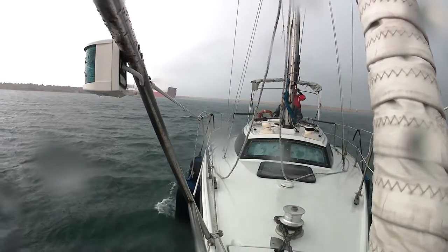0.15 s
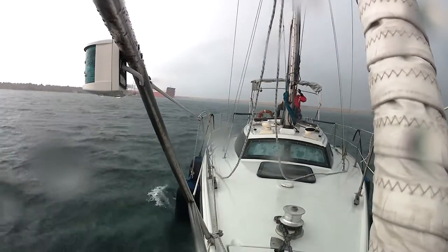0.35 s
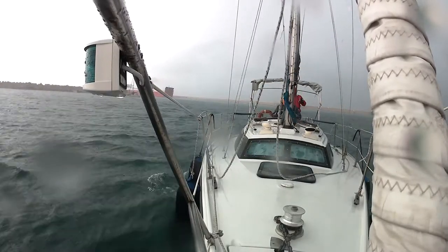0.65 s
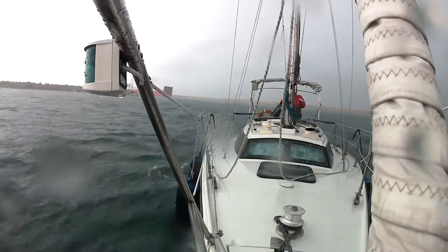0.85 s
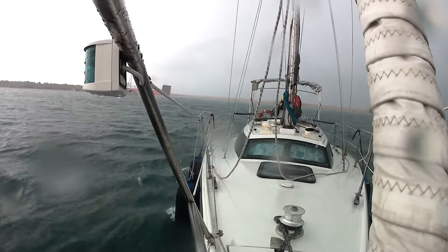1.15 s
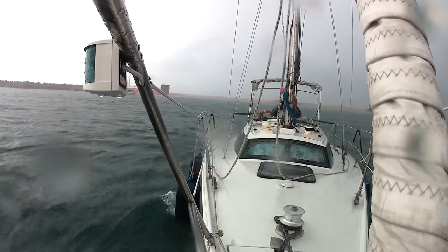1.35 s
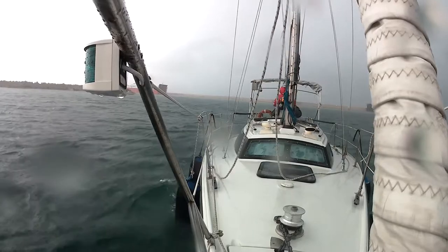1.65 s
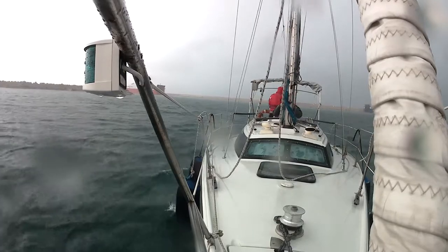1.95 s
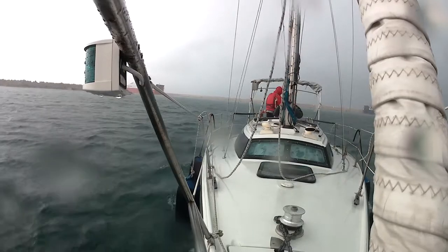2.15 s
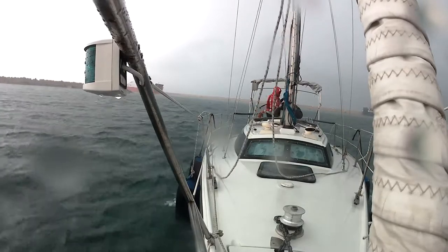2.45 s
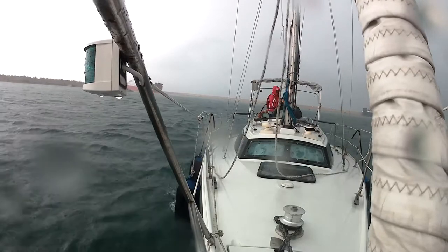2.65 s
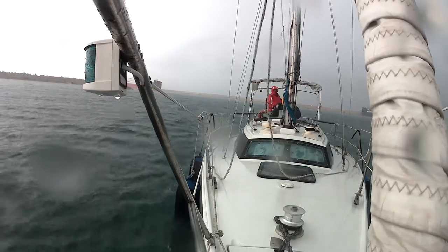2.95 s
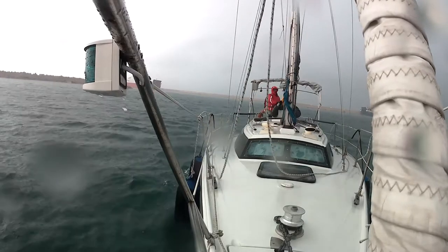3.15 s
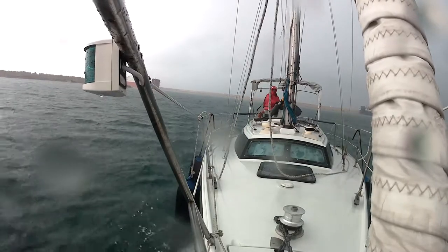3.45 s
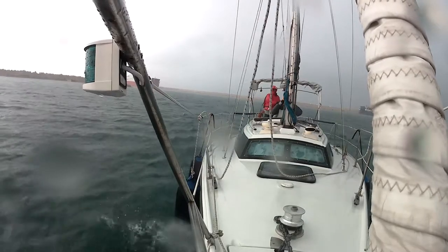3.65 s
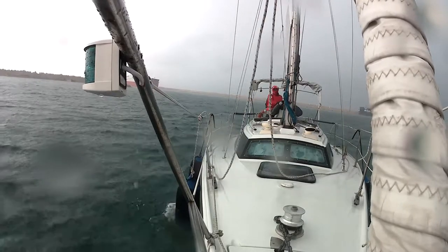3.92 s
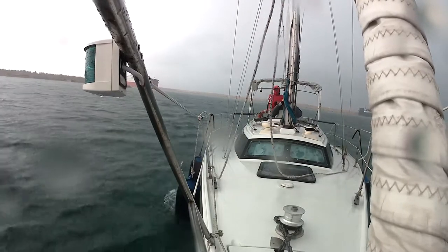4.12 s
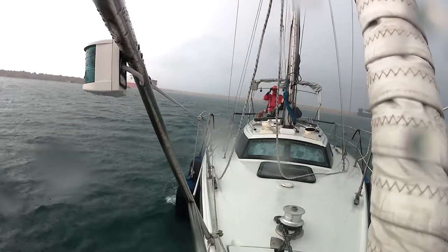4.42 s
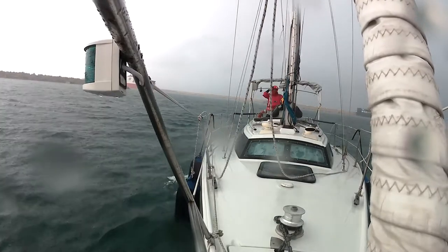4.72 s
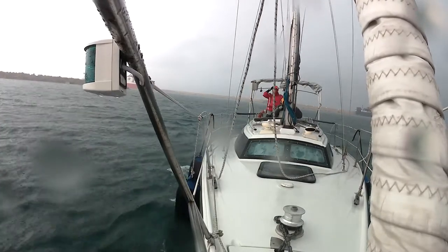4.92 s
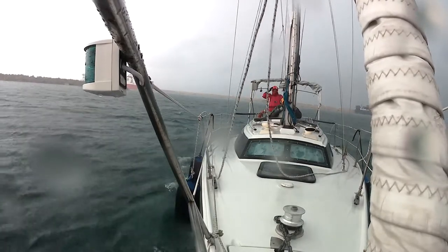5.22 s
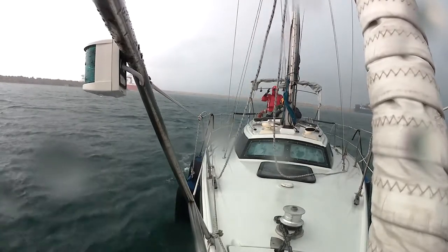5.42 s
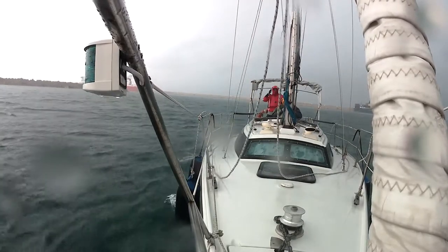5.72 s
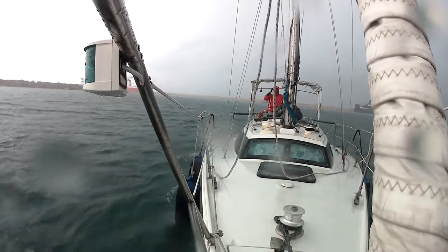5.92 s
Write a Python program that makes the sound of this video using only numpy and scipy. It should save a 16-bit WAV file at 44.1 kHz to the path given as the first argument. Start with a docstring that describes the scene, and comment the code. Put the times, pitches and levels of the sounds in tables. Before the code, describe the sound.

Muffled drops knock sharply close by while a boat's engine throbs, wind buffets and choppy water gurgles along the hull.

```python
"""Motoring through rain and choppy water

A sailing boat runs on its engine, heard from inside a waterproof case at the bow.
The engine throbs below, wind buffets the case and shakes its mount, and water washes along the hull.
Rain and spray tick on the case and make it ring; heavy lumps of water shove it.
Its wall shuts out the treble, and the hardest drops overload the microphone with thin, bright clicks."""
import sys
import numpy as np
from scipy import signal
from scipy.fft import rfft, irfft, next_fast_len
from scipy.io import wavfile
from scipy.ndimage import uniform_filter1d, minimum_filter1d, map_coordinates

SR = 44100
rng = np.random.default_rng(int(sys.argv[2]) if len(sys.argv) > 2 else 0)


def transcribe(u):
    """Save the signal u as a 16-bit wav file named by the first command-line argument.

    u: samples, shape (n,) or (channels, n), limited to [-1, 1]; the rate is SR.
    q: integer samples, one column per channel.
    """
    v = np.clip(np.atleast_2d(u).T, -1, 1)
    q = np.round(v * 32767).astype(np.int16)
    wavfile.write(sys.argv[1], SR, q)


N = 267687
TIME = np.arange(N) / SR


def amp(db):
    """Turn decibels (dB) into a number to multiply a sound by."""
    return 10 ** (np.asarray(db) / 20)


def unit(x):
    """Scale a sound to an average strength (rms) of 1."""
    return x / np.sqrt(np.mean(x ** 2) + 1e-20)


def curve(rows):
    """Join (seconds, value) points with straight lines, one value per sample."""
    return np.interp(TIME, *np.transpose(rows))


def wobble(rate):
    """A smooth curve through `rate` random values a second."""
    return map_coordinates(rng.standard_normal(int(N * rate / SR) + 4), [TIME * rate])


def filtered(x, response):
    """Turn each frequency up or down by the gain that response(hz) gives."""
    size = next_fast_len(N + SR // 2)
    return irfft(rfft(x, size) * response(np.fft.rfftfreq(size, 1 / SR)), size)[:N]


def coloured(x, spectrum):
    """Shape a sound's lows and highs by (Hz, dB) points, then scale it to strength 1."""
    points_hz, db = np.transpose(spectrum)
    log_hz = np.log(points_hz)
    return unit(filtered(x, lambda hz: amp(np.interp(np.log(hz + 1), log_hz, db, left=-120, right=-120))))


def rush(spectrum, patchy_db):
    """Shaped noise with random louder and softer patches across time and pitch."""
    cells = signal.stft(rng.standard_normal(N), nperseg=1024)[2]
    patches = uniform_filter1d(rng.standard_normal(cells.shape), size=4, axis=0)
    patches = unit(uniform_filter1d(patches, size=7, axis=1))
    noise = signal.istft(cells * amp(patchy_db * patches), nperseg=1024)[1][:N]
    return coloured(noise, spectrum)


def tone(hz):
    """A pure tone of strength 1 that follows a changing pitch."""
    return np.sqrt(2) * np.sin(2 * np.pi * (np.cumsum(hz) / SR + rng.random()))


def add(track, s, sound):
    """Mix a sound into the track, starting at s seconds."""
    start = max(round(s * SR), 0)
    part = track[start:start + len(sound)]
    part += sound[:len(part)]


# The hull's hum. Each row: time in seconds, relative level in dB.
HUM_LEVELS = [(0.0, -15.5), (1.64, -30.5), (1.86, -13.5), (2.59, -21.5), (3.21, -18.5), (3.38, -51),
              (3.5, -16.5), (3.92, -15), (4.21, -30.5), (4.34, -18), (5.99, -14.5), (6.07, -50)]
# The engine's steady tones. Each row: vibrations per turn of the shaft, level in dB.
ENGINE_TONES = [(1, -44.5), (5, -52.5), (6, -41.5), (9, -54.5), (10, -46), (11, -64.5), (13, -45.5),
                (16, -55), (17, -46.5), (22, -47.5)]

def engine(turns_per_s=17.8, beat_s=1.233, first_crest_s=0.32):
    """Two firings a turn throb through the hull, swelling and fading against a slightly slower shake."""
    shaft_hz = turns_per_s * (1 + 0.00406 * wobble(1.8))
    firing = 2 * np.pi * (np.cumsum(2 * shaft_hz) / SR + rng.random())
    lag = 2 * np.pi * (TIME - first_crest_s) / beat_s
    swing = amp(-20.5) * np.exp(1j * firing) + amp(-22.5) * np.exp(1j * (firing - lag))
    octave = amp(1) * swing ** 2  # twice the pitch, growing faster than the throb itself
    throb = np.sqrt(2) * np.imag(swing + octave)
    hum = tone(3 * shaft_hz)
    tones = sum(amp(db + 1.1 * wobble(2.9)) * tone(round(per_turn) * shaft_hz)
                for per_turn, db in ENGINE_TONES)
    hum_db = curve(HUM_LEVELS) - 2.33 + 2.5 * wobble(2.7)
    return throb + amp(hum_db) * hum + tones


# How hard the gusts shake the mount. Each row: time in seconds, relative level in dB.
GUST_LEVELS = [(0.0, -41), (0.32, -12.5), (0.37, -8.5), (0.56, -23.5), (0.81, -28), (0.86, -36.5),
               (1.2, -10), (1.77, -22.5), (1.84, -8.5), (2.65, -31.5), (2.86, -4.5), (3.16, -32.5),
               (4.21, -9), (4.36, -15), (5.11, -10.5), (5.27, -34), (5.99, -17), (6.07, -34.5)]
# The wind's rumble. Each row: frequency in Hz, relative level in dB.
RUMBLE_SPECTRUM = [(10, -15.5), (25, -7), (42, 5.5), (57, 6), (75, -4.5), (110, -10), (200, -15),
                   (400, -30.5), (900, -47.5)]

def wind(mount_hz=47.2):
    """Swirls of air push on the case and keep its mount shaking near one low pitch."""
    shake_db = curve(GUST_LEVELS)
    mount = amp(shake_db - 3.3) * tone(mount_hz + 0.976 * wobble(5.8))
    rumble_db = -24.5 + 0.022 * (shake_db - shake_db.mean()) + 2.0 * wobble(7.4)
    return mount + amp(rumble_db) * rush(RUMBLE_SPECTRUM, patchy_db=0.0)


def gurgles(count, fade_s=0.088):
    """Bubbles by the hull sound short low notes that rise as they near the surface."""
    out, t = np.zeros(N), np.arange(SR // 10) / SR
    for when, pitch, size in rng.random((count, 3)):
        hz = 255 + 220 * pitch
        note = np.sin(2 * np.pi * hz * t * (1 + 2.8 * t)) * (1 - np.exp(-t / 0.0019))
        add(out, when * N / SR, amp(12 * size ** 2 - 60 * t / fade_s) * note)
    return unit(out)


# Swells and lulls of the wash: waves on the hull, and the churn under the heavy drop near 5.33 s. Each row:
# middle in seconds, change in dB, half length in seconds.
WAVE_SWELLS = [(0.123, 1.5, 0.016), (0.655, 6, 0.031), (0.78, -3, 0.04), (1.342, 3, 0.11),
               (1.866, 3, 0.025), (2.19, -4, 0.03), (2.94, 5, 0.027), (3.15, 3, 0.041), (3.618, 3.5, 0.12),
               (3.845, 2.5, 0.54), (4.48, -4.5, 0.28), (4.72, 5, 0.033), (5.026, 5.5, 0.093),
               (5.33, 3.5, .08), (5.936, 5.5, 0.029)]
# The churning water. Each row: frequency in Hz, relative level in dB.
WASH_SPECTRUM = [(90, -17.5), (180, -9), (232, 0.5), (258, -5.5), (292, -0.5), (325, -3.5), (388, 2.5),
                 (465, -10), (505, -4.5), (560, -12.5), (700, -20), (1000, -20.5), (2000, -47.5),
                 (4000, -67.5)]

def wash():
    """The bow wave churns and gurgles along the hull, sounding hollow through the case."""
    bubbles = amp(-9) * gurgles(count=220)
    swell_db = sum(db * np.exp(-((TIME - s) / half_s) ** 2) for s, db, half_s in WAVE_SWELLS)
    level_db = -34 + swell_db + 0.37 * wobble(13.0)
    return amp(level_db) * (rush(WASH_SPECTRUM, patchy_db=2.5) + bubbles)


# The notes the case rings with. Each row: pitch in Hz, relative level in dB, seconds to fade by 60 dB.
CASE_NOTES = [(420, -23.5, 0.0042), (954, -12.5, 0.0093), (1144, -7, 0.0082), (1503, -0.5, 0.0081),
              (1906, -11, 0.012), (2360, -3.5, 0.015), (2750, -9.5, 0.0039), (3237, -5.5, 0.013),
              (3622, -7, 0.0092)]

def case_ring(tuning, bright_db):
    """One blow rings the case briefly, a little differently with each landing spot and film of water."""
    t = np.arange(SR // 32) / SR
    hz, note_db, fade_s = np.transpose(CASE_NOTES)
    detune, scatter, damping = rng.standard_normal((3, len(hz)))
    pitch = hz * (tuning / 1500) ** 0.5 * (1 + 0.053 * detune)
    strength = (-1) ** np.arange(len(hz)) * amp(note_db + 3 * scatter)
    life_s = fade_s * np.exp(0.18 * damping)
    shape = amp(-60 * t / life_s[:, None]) * (1 - np.exp(-t / 0.00042))
    notes = strength[:, None] * shape * np.sin(2 * np.pi * pitch[:, None] * t)
    lows = unit(notes[hz < 2200].sum(axis=0))
    highs = unit(notes[hz > 2200].sum(axis=0))
    ring = lows + amp(bright_db) * highs
    return ring / np.sqrt(np.mean(ring[t < .005] ** 2))  # strength 1 over the first 5 milliseconds


# The water's hiss. Each row: time in seconds, relative level in dB.
HISS_LEVELS = [(0.0, -40.5), (0.12, -40), (0.25, -41.5), (0.51, -38), (0.74, -38.5), (1.69, -37.5),
               (1.76, -37.5), (2.18, -38), (2.69, -36), (3.01, -37.5), (3.2, -40.5), (3.46, -38),
               (3.99, -37), (4.29, -40), (4.62, -36.5), (4.95, -38), (5.82, -40), (6.07, -37.5)]
# The patter that makes up the hiss. Each row: frequency in Hz, relative level in dB.
PATTER_SPECTRUM = [(500, -13.5), (830, -12.5), (1030, -1), (1160, 4.5), (1280, -5), (1490, 7), (1650, -3.5),
                   (1850, -3), (2130, -7), (2280, -13.5), (2500, -19), (2800, -25.5), (3300, -21.5),
                   (3800, -29.5), (4500, -44)]

def drizzle(count, spread_db, follow_share=0.61, mean_delay_s=0.024):
    """Fine droplets tap the case, at random or just after drops, over a hiss of countless more."""
    taps = np.zeros(N)
    for when, follows, size, pitch, bright in rng.random((count, 5)):
        after_drop = DROP_HITS[int(when * len(DROP_HITS))][0] + rng.exponential(mean_delay_s)
        s = after_drop if follows < follow_share else when * N / SR
        ring = case_ring(tuning=1150 + 700 * pitch, bright_db=-20 + 15 * bright)
        add(taps, s, amp(-38.5 + spread_db * size ** 3) * ring)
    grain = amp(2 * wobble(300))
    patter = unit(grain * rush(PATTER_SPECTRUM, patchy_db=3.5))
    hiss_db = curve(HISS_LEVELS) - 1.5 + 2.2 * wobble(30)
    return taps + amp(hiss_db) * patter


# Drops striking the case. Each row: start in seconds, relative level in dB,
# tuning (1500 is the case's usual pitch, more is higher), relative brightness in dB.
DROP_HITS = [(0.0737, -32, 1660, -2.0), (0.174, -14, 1550, -8.5), (0.1974, -36, 1500.0, -4),
             (0.2048, -30, 1760, 5), (0.278, -32.5, 1585, -3), (0.4305, -41, 1480, -5),
             (0.533, -20, 1480.0, -8.5), (0.5592, -36, 1580.0, -4), (0.6225, -14.0, 1435, -11.5),
             (0.6623, -29, 1740, -30), (0.8927, -29.5, 1560.0, -1.5), (0.913, -21.5, 1550, -4.5),
             (0.923, -36, 1430, -16.5), (1.0472, -30.5, 1290.0, -3.5), (1.1211, -28, 1660, 0),
             (1.1938, -35, 1250, -7), (1.2742, -15.0, 1514, -7.5), (1.3365, -15, 1530, -7),
             (1.437, -22.5, 1570, -6.0), (1.511, -33.5, 1650, -3.5), (1.5634, -34, 1700.0, -4.5),
             (1.6282, -15.5, 1365, -4), (1.7664, -21.5, 1370, -19), (1.8678, -34.0, 1550.0, -9),
             (1.9359, -24.5, 1680, -3.5), (1.9613, -26, 1470.0, -21), (2.0107, -36, 1620.0, -4),
             (2.1671, -25, 1330, -39), (2.2133, -19.5, 1620, -2.5), (2.2329, -25, 1820, 1),
             (2.3266, -24.5, 1560, -5.5), (2.363, -25.5, 1500, 1.5), (2.398, -10.5, 1510.0, -9.0),
             (2.4608, -38, 1670.0, -15), (2.4858, -18.5, 1484, -9), (2.5275, -27, 1500.0, -15),
             (2.5741, -9, 1500.0, -11), (2.618, -32, 1390, -39), (2.7171, -23, 1540.0, -6),
             (2.7528, -29, 1620.0, -11.5), (2.7831, -24, 1480.0, -8), (2.7935, -27.5, 1300.0, -5),
             (2.858, -28, 1630.0, -13), (2.932, -27.5, 1640.0, -20.5), (2.9849, -26.5, 1700.0, -12.5),
             (3.082, -28, 1620, 0), (3.1303, -9.5, 1556, -11), (3.143, -28, 1560, -26),
             (3.184, -27, 1710.0, -4), (3.2659, -21.5, 1590.0, -0.5), (3.288, -12.5, 1490, -16.5),
             (3.298, -40, 1480, -22), (3.3651, -19.5, 1520, -8.0), (3.5722, -20, 1496, -6.5),
             (3.5835, -21, 1560, -1.5), (3.6484, -22, 1560.0, -10.5), (3.6548, -18, 1470, -5.0),
             (3.69, -23.5, 1520, -12), (3.736, -40.5, 1500.0, -2.5), (3.773, -43, 1500.0, 3.5),
             (3.8395, -26, 1650, -20), (3.8669, -14.5, 1590, -11), (3.919, -22, 1580, -3),
             (3.931, -30, 1510.0, -7), (4.0061, -18, 1866, -7), (4.0701, -8, 1530, -9.0),
             (4.0956, -24.5, 1580.0, -16.5), (4.1212, -22, 1520.0, -5.5), (4.2406, -35.5, 1510, -1.0),
             (4.2867, -37, 1490, -2.5), (4.3543, -31.5, 1410.0, -2), (4.4237, -30.5, 1400.0, -11.5),
             (4.5385, -32, 1500, -26), (4.5743, -17, 1500, -9.5), (4.614, -28.5, 1570, -14),
             (4.6783, -21, 1438, -1), (4.6832, -24.5, 1480.0, 0), (4.7485, -32, 1600, -8.5),
             (4.7563, -26.5, 1394, -4.5), (5.2565, -12.5, 1458, -6), (5.3198, -30.5, 1290, -9.5),
             (5.3505, -7.5, 1495, -5.5), (5.4535, -18, 1700.0, -6.5), (5.4781, -23, 1760, -3),
             (5.487, -24.5, 1476, -3.5), (5.503, -36.5, 1500.0, -8), (5.5614, -37.5, 1370.0, -8),
             (5.5781, -32, 1630.0, -20), (5.7742, -18, 1520, -18.5), (5.862, -35.5, 1500.0, -5),
             (6.0643, -36, 1410, 1)]

def drops(splash_fade_s=0.04, mean_flight_s=0.0091):
    """Each drop knocks the case, slaps again as it collapses, and throws a splash and two droplets."""
    out, t = np.zeros(N), np.arange(SR // 16) / SR
    for s, level_db, tuning, brightness_db in DROP_HITS:
        knock_db, bright_db = level_db + 1.06, brightness_db + 1
        splash_bright_db = bright_db + 4  # tiny blows favour the higher notes
        add(out, s, amp(knock_db) * case_ring(tuning, bright_db))
        slap_s = s + rng.uniform(0.0029, 0.008)
        add(out, slap_s, amp(knock_db - 13) * case_ring(tuning, bright_db))
        tiny_blows = rng.laplace(size=len(t))
        splash = unit(signal.fftconvolve(tiny_blows, case_ring(tuning, splash_bright_db))[:len(t)])
        add(out, s, amp(knock_db - 12 - 60 * t / splash_fade_s) * splash)
        for flight_s in rng.exponential(mean_flight_s, size=2):
            add(out, s + flight_s, amp(knock_db - 23.5) * case_ring(tuning, splash_bright_db))
    return out


# The fizz around a knock. Each row: frequency in Hz, relative level in dB.
FIZZ_SPECTRUM = [(900, -14.5), (1500, -0.5), (2000, -0.5), (2400, 1), (2800, -5), (3300, 0), (4200, -10)]

def fizz(half_length_s=0.013, middling_db=-20.5, grains_per_s=2500):
    """A soft, grainy fizz surrounds each drop's knock, louder when the knock has more treble."""
    power, t = np.zeros(N), np.arange(-SR // 20, SR // 20) / SR
    for s, level_db, _, bright_db in DROP_HITS:
        treble_db = level_db + bright_db - 10 * np.log10(1 + amp(bright_db) ** 2)
        fizz_db = middling_db - 13 + 0.76 * (treble_db - middling_db)
        add(power, s + t[0], amp(fizz_db) ** 2 * np.exp(-(t / half_length_s) ** 4))
    grains = rng.standard_normal(N) * (rng.random(N) < grains_per_s / SR)
    return np.sqrt(power) * coloured(grains, FIZZ_SPECTRUM)


# Clicks of overload. Each row: start in seconds, relative peak level in dB.
OVERLOAD_CLICKS = [(0.1736, -36), (1.2, -57), (1.338, -55.5), (1.631, -54), (2.398, -22), (2.575, -19),
                   (2.8924, -46), (3.1308, -19.5), (3.288, -25.5), (3.8672, -54), (3.9575, -56),
                   (4.009, -49), (4.0724, -22.5), (4.188, -52), (4.5755, -33.5), (5.256, -26.5),
                   (5.3516, -24)]
# The noise in a click. Each row: frequency in Hz, relative level in dB.
CLICK_SPECTRUM = [(3500, -5), (4700, -1.5), (7000, -7), (10000, -12.5), (16000, -26)]

def overload_clicks(fade_s=0.0045):
    """Brief, thin, bright clicks of overload, on the hardest knocks and a few rumble peaks."""
    out, t = np.zeros(N), np.arange(SR // 100) / SR
    noise = coloured(rng.standard_normal(N), CLICK_SPECTRUM)
    for s, db in OVERLOAD_CLICKS:
        click = noise[round(s * SR):][:len(t)] * amp(-60 * t / fade_s)
        add(out, s, amp(db + 1.5) * click / np.abs(click).max())
    return out


# Heavy lumps of water. Each row: middle in seconds, peak level in dB.
THUD_HITS = [(0.176, -22), (2.3995, -13), (3.133, -14.5), (3.290, -26), (4.072, -11), (5.2578, -15.5),
             (5.352, -6.5)]

def thuds(centre_hz=436):
    """Each lump of water shoves the whole case: one low push with no ring."""
    out = np.zeros(N)
    for s, db in THUD_HITS:
        phase = 2 * np.pi * centre_hz * (TIME - s)
        out += amp(db) * phase * np.exp((1 - phase ** 2) / 2)
    return out


# Air gulped against the hull. Each row: start in seconds, relative peak level in dB, first pitch in Hz.
AIR_POCKETS = [(0.652, -22, 309), (1.562, -19.5, 402), (1.846, -16, 374), (1.961, -27, 496),
               (2.111, -22, 380), (2.922, -16.5, 296), (3.163, -19, 336), (3.605, -27, 283),
               (3.915, -23.5, 386), (4.067, -31, 356), (4.299, -20.5, 380), (4.973, -28.5, 353)]

def sloshes(rise_s=0.00067, fade_s=0.12):
    """A trapped pocket of air sounds one hollow, unsteady, slightly rising note."""
    out, t = np.zeros(N), np.arange(SR // 6) / SR
    shape = (1 - np.exp(-t / rise_s)) * amp(-60 * t / fade_s)
    for s, db, hz in AIR_POCKETS:
        phase = 2 * np.pi * (hz * t * (1 + 1.2 * t) + rng.random())
        waver = 0.69 * wobble(150)[:len(t)]
        add(out, s, amp(db - 1.5) * shape / shape.max() * np.sin(phase + waver))
    return out


# Fat drops. Each row: start in seconds, relative level in dB, pitch in Hz that the note settles near.
FAT_DROPS = [(1.049, -22.5, 1170), (1.196, -24, 1190), (1.642, -6.5, 1182), (2.5735, 0, 1189),
             (2.79, -29, 1090), (4.189, -22.5, 1146), (4.759, -13.5, 1134), (4.836, -24, 1150),
             (5.962, -9, 1178)]

def plops(rise_s=0.00044, fade_s=0.032):
    """A fat drop plops with one fading note that starts high and quickly sags."""
    out, t = np.zeros(N), np.arange(SR // 12) / SR
    sag = 0.998 + 0.2 * np.exp(-t / 0.00058)
    shape = (1 - np.exp(-t / rise_s)) * amp(-60 * t / fade_s)
    for s, db, hz in FAT_DROPS:
        phase = 2 * np.pi * np.cumsum(hz * sag) / SR
        add(out, s, amp(db + 3.0) * shape * np.sin(phase))
    return out


def overloaded(x, limit=0.96):
    """The hardest knocks overload the microphone and flatten at their tips."""
    return x / (1 + np.abs(x / limit) ** 30) ** (1 / 30)


# What the wall of the case lets through. Each row: frequency in Hz, change of level in dB.
WALL_RESPONSE = [(3400, 0.5), (3850, -6), (4250, -6.5), (4700, -24), (6000, -75.5)]

def through_wall(x):
    """The wall of the case shuts out the treble."""
    return filtered(x, lambda hz: amp(np.interp(hz, *np.transpose(WALL_RESPONSE))))


def scene():
    """All the sounds mix into one channel; the wall muffles everything but the overload clicks."""
    around = engine() + wind() + wash() + sloshes() + thuds() + fizz() + drizzle(count=70, spread_db=3.5)
    knocks = overloaded(drops() + plops())
    return (through_wall(around + knocks) + overload_clicks())[None]


def record(dry, ceiling=0.85, window_s=0.002, top_hz=16500):
    """A quick limiter turns down peaks that pass the ceiling, then the very highest treble is cut."""
    size = round(window_s * SR)
    needed_gain = ceiling / np.maximum(np.abs(dry[0]), ceiling)
    gain = uniform_filter1d(minimum_filter1d(needed_gain, size), size)
    return filtered(gain * dry[0], lambda hz: 1 / (1 + (hz / top_hz) ** 30))[None]


dry = scene()
out = record(dry)
transcribe(out)
```